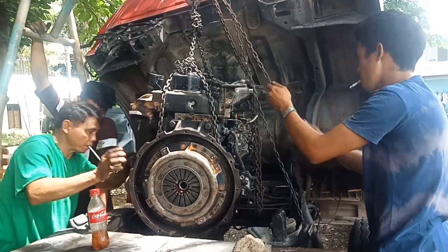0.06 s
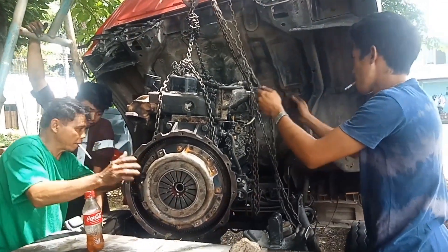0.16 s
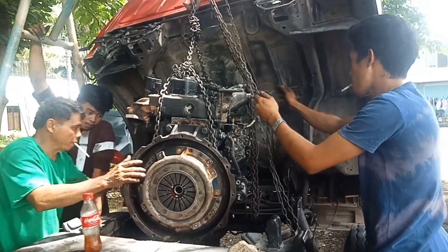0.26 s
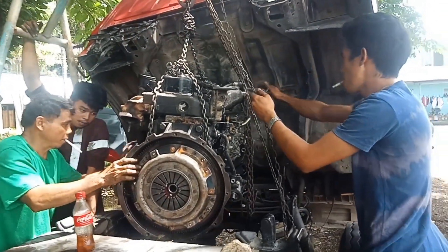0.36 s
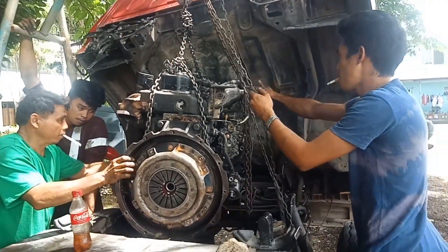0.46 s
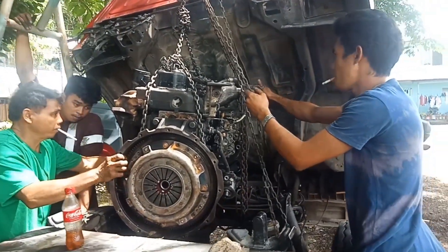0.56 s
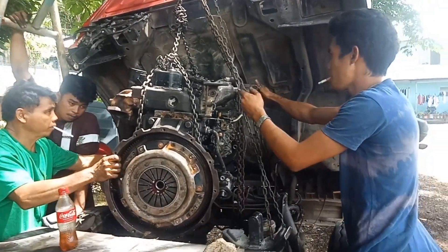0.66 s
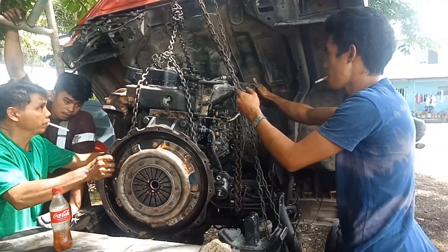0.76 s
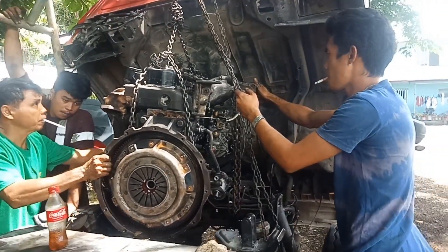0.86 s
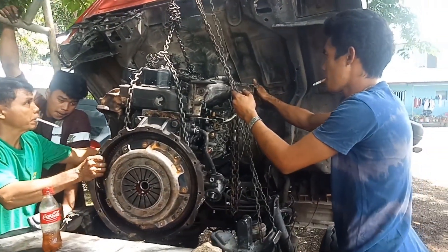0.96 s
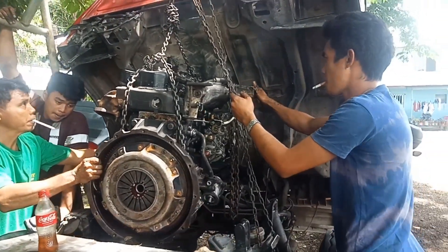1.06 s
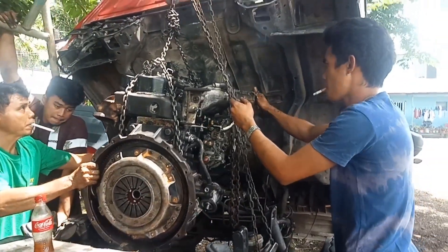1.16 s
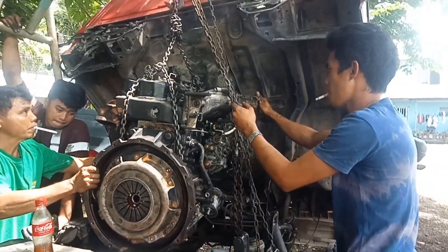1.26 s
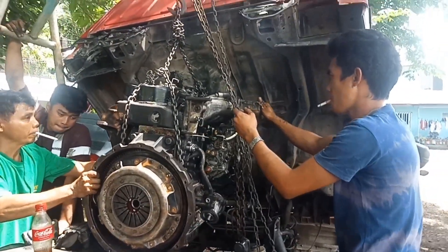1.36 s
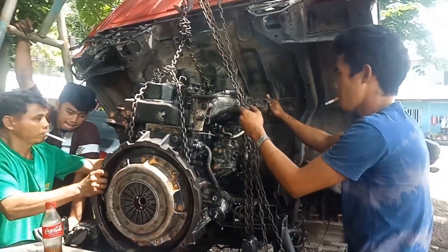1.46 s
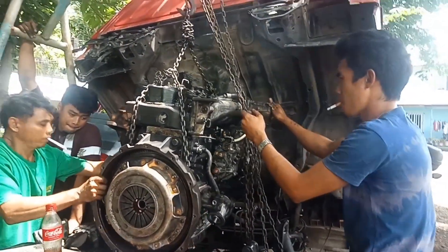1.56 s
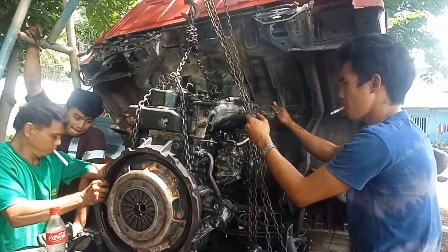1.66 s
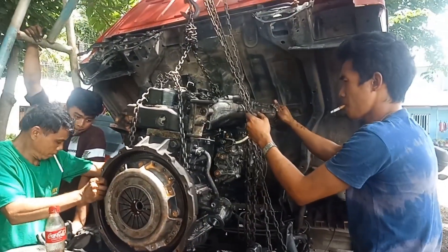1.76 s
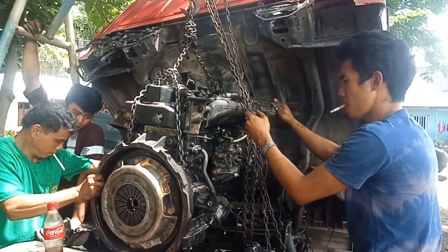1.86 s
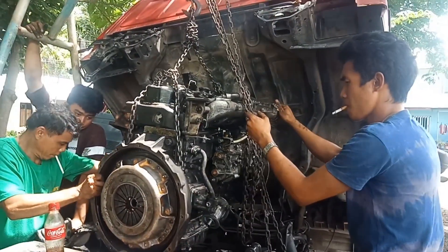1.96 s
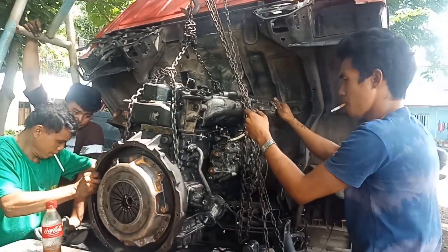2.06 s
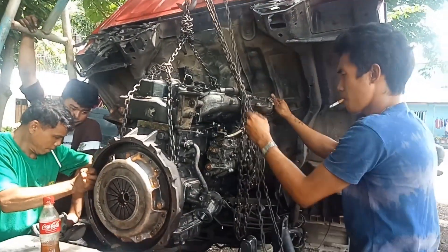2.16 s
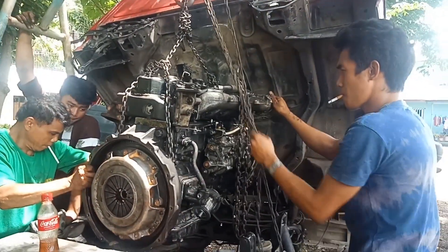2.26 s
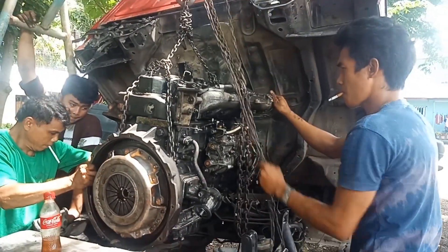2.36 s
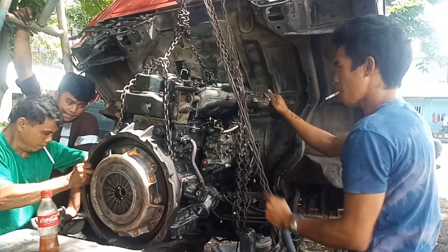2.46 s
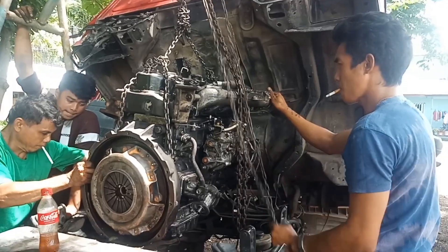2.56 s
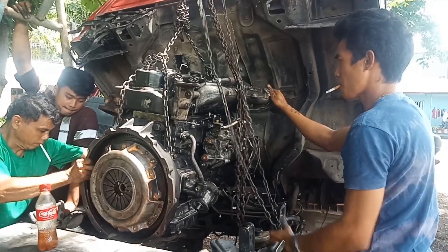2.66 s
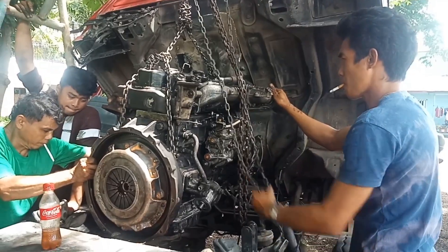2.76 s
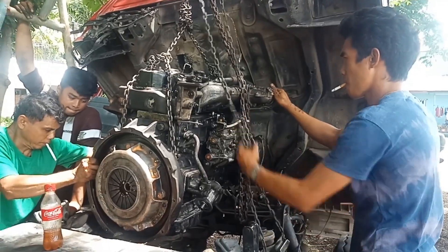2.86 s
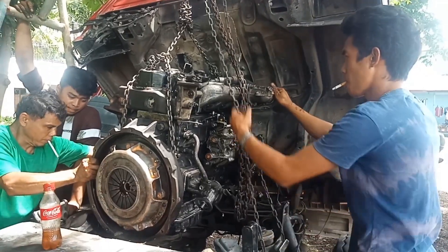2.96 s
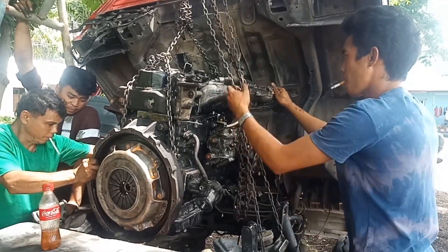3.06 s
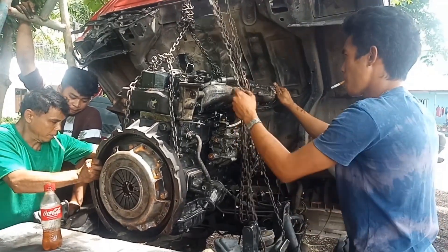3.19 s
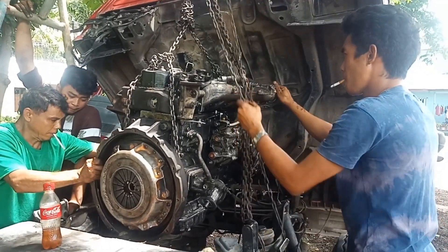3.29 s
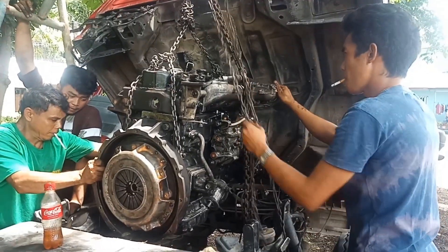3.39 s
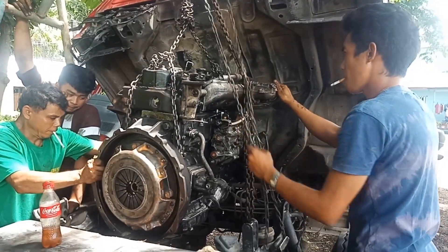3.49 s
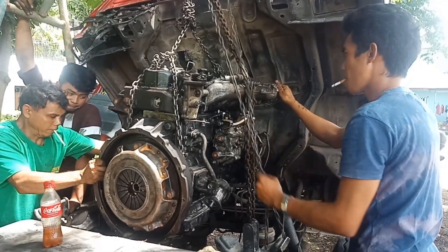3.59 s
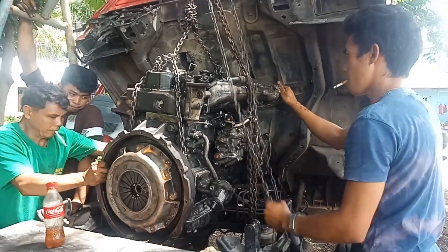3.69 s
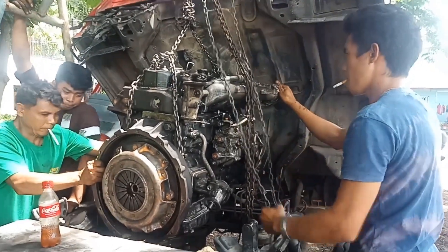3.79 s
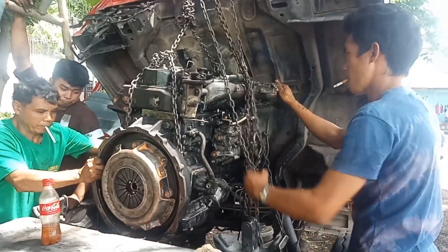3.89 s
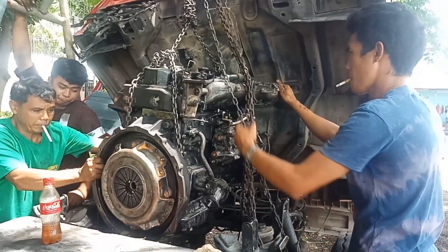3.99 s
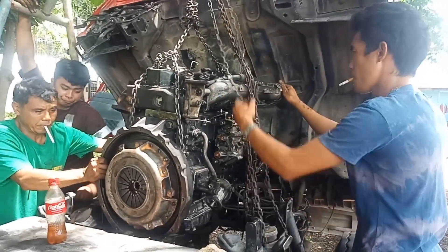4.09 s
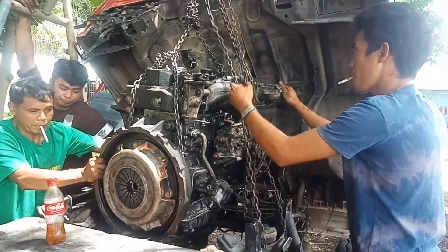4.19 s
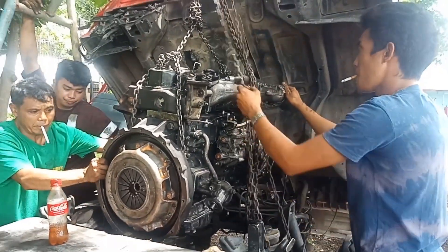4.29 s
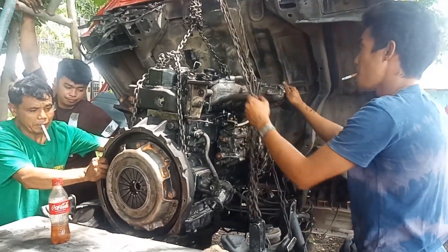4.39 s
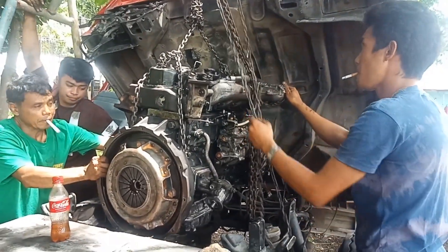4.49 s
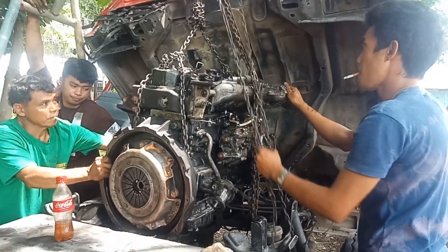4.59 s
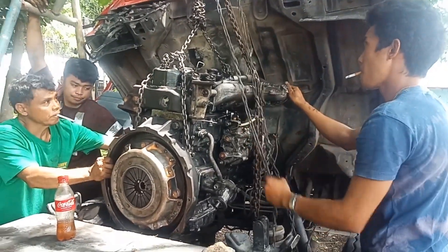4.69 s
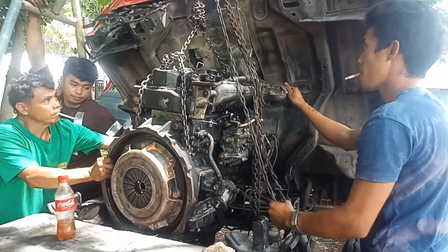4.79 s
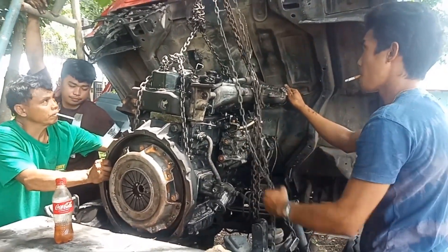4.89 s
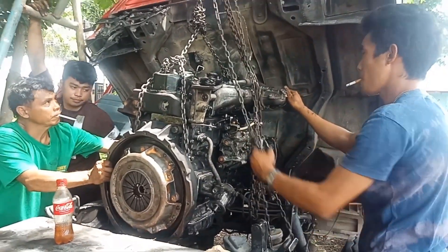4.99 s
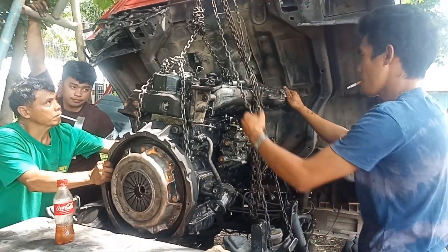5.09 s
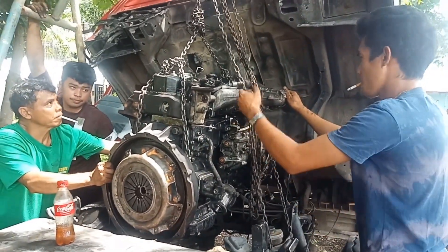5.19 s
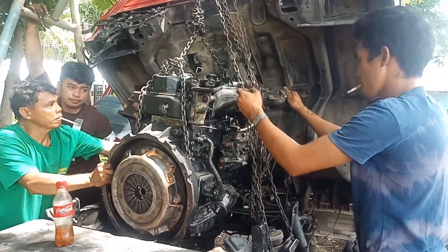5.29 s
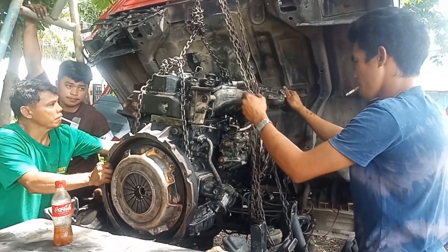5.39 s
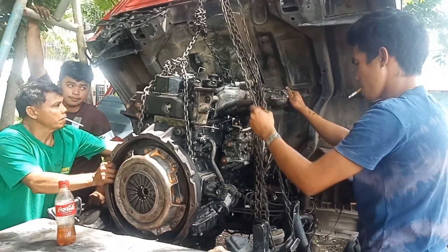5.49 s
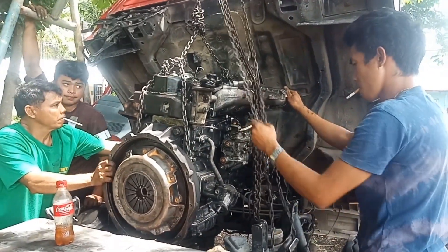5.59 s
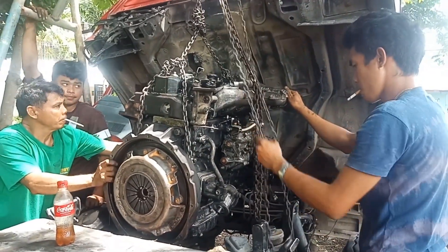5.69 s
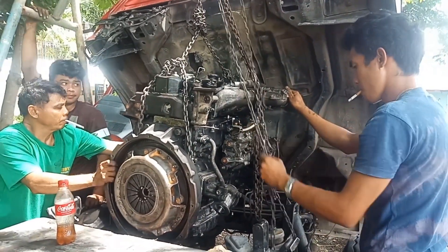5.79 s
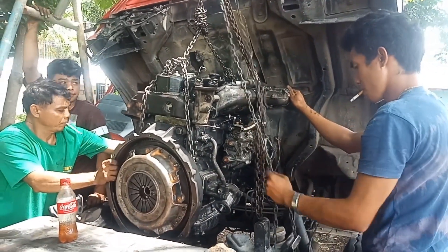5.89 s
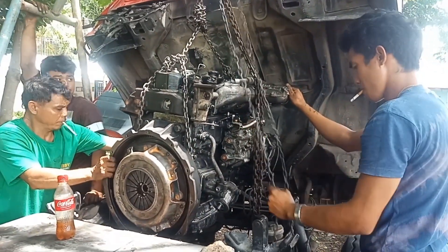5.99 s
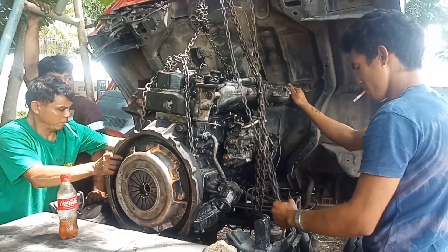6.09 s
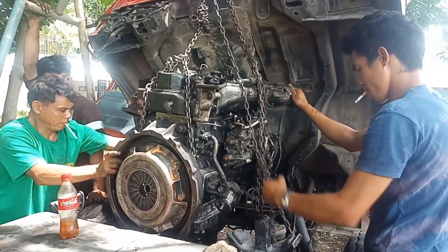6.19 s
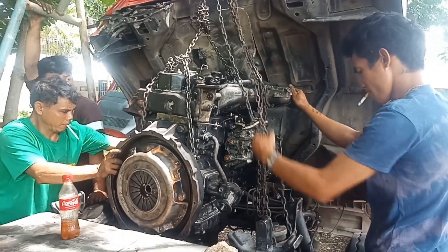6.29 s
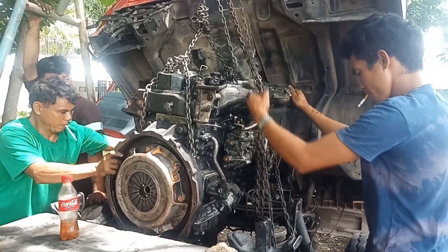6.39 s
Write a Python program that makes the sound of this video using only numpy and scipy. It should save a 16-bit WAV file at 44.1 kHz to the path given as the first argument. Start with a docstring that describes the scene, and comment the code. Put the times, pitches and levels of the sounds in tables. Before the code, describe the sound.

A slack steel chain clinks briefly, a faint bird whistles, then four rattling pulls run links clacking through a hand hoist in an open yard.

```python
"""A chain hoist lifts an engine under a tilted truck cab in an open-air workshop.
Filtered noise makes the yard, and wavering sine tones make a motor droning far away that speeds up at the end.
First the slack hand chain clinks a few times: noise and decaying tones ring like struck steel.
Then a small far-off bird gives thin gliding whistles. Four pulls follow: links clack on the guide,
knock into the pockets of the hand wheel as short hollow tones, and jingle against each other."""
import sys
import numpy as np
from scipy import signal
from scipy.fft import rfft, irfft
from scipy.io import wavfile
from scipy.ndimage import uniform_filter1d, minimum_filter1d

SR = 44100
rng = np.random.default_rng(int(sys.argv[2]) if len(sys.argv) > 2 else 0)


def dump(signal):
    """Clip the signal to [-1, 1] and save it as 16-bit WAV at the path in sys.argv[1]."""
    limited = np.clip(np.atleast_2d(signal).T, -1, 1)
    pcm = np.round(limited * 32767).astype(np.int16)
    wavfile.write(sys.argv[1], SR, pcm)


N = 284344
TIME = np.arange(N) / SR


def amp(db):
    """Turns decibels into a gain."""
    return 10 ** (np.asarray(db) / 20)


def unit(x):
    """Scales a sound to an average (rms) strength of 1."""
    return x / np.sqrt(np.mean(x ** 2) + 1e-20)


def read(points, hz):
    """Reads a curve between its points, with pitch on a log scale."""
    point_hz, value = np.transpose(points)
    return np.interp(np.log(hz + 1), np.log(point_hz + 1), value)


def add(mix, s, sound):
    """Mixes a sound in at time s, in seconds."""
    part = mix[max(round(s * SR), 0):][:len(sound)]
    part += sound[:len(part)]


def band(x, low_hz, high_hz):
    """Keeps the part of a sound between two pitches."""
    return signal.sosfilt(signal.butter(2, [low_hz, high_hz], "band", fs=SR, output="sos"), x)


def colour(x, gain_db):
    """Filters with gains on an even grid from 0 to SR / 2; nothing sounds early, so attacks stay sharp."""
    log_gain = np.log(amp(np.maximum(gain_db - gain_db.max(), -100)))
    circle = np.concatenate([log_gain, log_gain[-2:0:-1]])
    taps = irfft(np.exp(np.conj(signal.hilbert(circle)))[:len(log_gain)])
    return signal.fftconvolve(x, taps)[:len(x)]


# colour of the outdoor noise: (pitch_hz, relative level_db)
AIR = [(15, -65.5), (25, -43.5), (48, -21.5), (64, -7.5), (101, -4.5), (160, -2), (253, -18), (313, -16),
       (433, -24.5), (469, -24), (741, -24.5), (4000, -30.5), (4800, -45.5), (5880, -55), (15500, -58.5)]
# distant motor: (time_s, relative level_db of the low tone, relative level_db of its octave)
MOTOR = [(0.0, -59, -59), (0.9, -49, -54), (0.95, -61.5, -68), (3.43, -53, -49.5), (4.92, -56.5, -60.5),
         (5.44, -53.5, -45.5), (6.45, -44.5, -57)]
# speed of the motor, rising at the end: (time_s, firing rate_hz)
MOTOR_RATE = [(0, 75.8), (5.7, 79), (6.2, 83.7)]


def yard(air_db=-52.5, swell_db=1, hiss_db=-84, rumble_db=-70, motor_db=-1):
    """Gently swelling outdoor noise, and a far motor as two tones that waver in pitch and strength."""
    drift = []
    for _ in range(4):
        slow = uniform_filter1d(rng.standard_normal(N), size=5000)
        drift.append(unit(uniform_filter1d(slow, size=3000)))
    air_gain = amp(read(AIR, np.fft.rfftfreq(N, 1 / SR)))
    air = irfft(rfft(rng.standard_normal(N)) * air_gain, N)
    air = amp(air_db + swell_db * drift[3]) * unit(air)
    hiss = amp(hiss_db) * rng.standard_normal(N)
    rumble = amp(rumble_db) * unit(band(rng.standard_normal(N), 35, 65))

    s, *columns = np.transpose(MOTOR)
    low_db, high_db = (motor_db + np.interp(TIME, s, column) for column in columns)
    hz = np.interp(TIME, *np.transpose(MOTOR_RATE))
    phase = 2 * np.pi * np.cumsum(hz * (1 + 0.012 * drift[0])) / SR
    low = amp(low_db + 2 * drift[1]) * np.sin(phase)
    octave = amp(high_db + 2 * drift[2]) * np.sin(2 * phase)
    return air + hiss + rumble + np.sqrt(2) * (low + octave)


# a small bird far off: (start_s, length_s, start_pitch_hz, end_pitch_hz, level_db)
CHIRPS = [(1.2, 0.23, 4950, 4500, -70.5), (1.44, .16, 5100, 4850, -81), (1.655, .025, 5700, 5400, -73),
          (2.09, .04, 5800, 5600, -75)]


def bird(flutter=0.014):
    """Thin falling whistles with a fluttering pitch."""
    out = np.zeros(N)
    for s, length, start_hz, end_hz, db in CHIRPS:
        hz = np.geomspace(start_hz, end_hz, round(length * SR))
        wobble = unit(uniform_filter1d(rng.standard_normal(len(hz)), size=150))
        hz = hz * (1 + flutter * wobble)
        add(out, s, amp(db) * np.hanning(len(hz)) * np.sin(2 * np.pi * np.cumsum(hz) / SR))
    return out


# how long the echoes last: (pitch_hz, time to fall by 60 dB_s)
SHED = [(250, 0.99), (700, 0.25), (1800, 0.27), (4500, 0.14), (12000, 0.12)]


def shed(x, wet_db=-10, first_s=.012):
    """Scattered echoes from cab and roof, the low pitches lasting longest."""
    taps = rng.standard_normal(SR // 2) * (rng.random(SR // 2) < 3000 / SR)  # about 3000 echoes a second
    hz, t, z = signal.stft(taps, SR, nperseg=256)
    fade = amp(-60 * t / read(SHED, hz)[:, None])
    tail = signal.istft(z * fade, SR, nperseg=256)[1]
    out = x.copy()
    add(out, first_s, amp(wet_db) * signal.fftconvolve(x, tail / np.linalg.norm(tail)))
    return out


# the swinging loop bumping the engine and frame: (start_s, relative level_db, pitch_hz)
BUMPS = [(0.215, -29, 340), (0.566, -40.5, 340), (2.209, -24, 306), (2.916, -41, 285), (4.019, -35, 265),
         (4.988, -20, 352), (5.08, -25, 272), (5.149, -32, 250), (5.586, -24, 284), (5.659, -21, 333),
         (5.8, -23, 264), (6.028, -21, 255), (6.262, -20.5, 375)]


def bumps(level_db=-3, octaves=0.48, rise_s=.003, t60_s=0.22):
    """Dull blows: a short burst of noise gathered around one low pitch."""
    t, hz = np.arange(SR // 3) / SR, np.fft.rfftfreq(4096, 1 / SR)
    out = np.zeros(N)
    for s, db, pitch in BUMPS:
        blow = rng.standard_normal(len(t)) * amp(-60 * t / t60_s) * (1 - np.exp(-t / rise_s))
        distance = np.log2((hz + 1) / pitch) / octaves
        blow = colour(blow, -10 * np.log10(1 + distance ** 4))
        add(out, s, amp(db + level_db) * blow / abs(blow).max())
    return out


# long-ringing tones of the frame: (pitch_hz, relative level_db, time to fall by 60 dB_s)
FRAME = [(270.6, -12, 0.19), (309, -12.5, 0.11), (1002, -4, 0.09), (1054, -3, 0.18), (1980, -6, .12),
         (2915, -6.5, 0.18)]


def frame(chain, contact, level_db=-39, firmness=1.2):
    """The loop clatters dully wherever it touches the frame; firm contact favours the long-ringing tones."""
    t = np.arange(SR // 2) / SR
    drive = chain * contact ** firmness
    rings = np.zeros(N)
    for hz, db, t60 in FRAME:
        tone = amp(-60 * t / t60) * np.sin(2 * np.pi * hz * t)
        rings += amp(db) * unit(signal.fftconvolve(drive, tone)[:N])
    clatter = band(chain * contact, 220, 480)
    return amp(level_db) * rings + clatter


PULL_SKEW, SWAY_SKEW = 0.58, 0.63  # below 1, a movement is fastest early on


def stroke(start, length, skew):
    """Speed of the chain, 0 to 1, through one movement: it gathers quickly and runs out slowly."""
    progress = np.clip((TIME - start) / length, 0, 1)
    return np.maximum(np.sin(np.pi * progress ** skew), 0)


# hauls on the hand chain:
# (start_s, length_s, relative level_db at full speed, closeness of the loop to the frame_db)
PULLS = [(2.19, 0.74, -17, -15), (3.335, 0.64, -14.5, -17), (4.42, 0.54, -14.5, -17),
         (5.56, 0.98, -16, -2.5)]
# the slack loop swaying or being gathered up between pulls: the same four columns
SWAYS = [(0.216, 0.24, -44.5, -13), (0.461, 0.35, -38, -11.5), (2.139, 0.34, -41, -20),
         (2.803, 0.42, -36.5, -2), (3.209, 0.48, -28, -13.5), (4, 0.35, -36, -7.5), (4.327, 0.26, -28, -14),
         (4.964, 0.33, -29, -3), (5.394, 0.49, -28, -19)]


def motion(speed_power=0.84):
    """Loudness of the pulled chain and of the slack loop, and the share of their rattle reaching the frame."""
    moves = [(row, PULL_SKEW) for row in PULLS] + [(row, SWAY_SKEW) for row in SWAYS]
    levels = []
    for (s, length, db, _), skew in moves:
        levels.append(amp(db) * stroke(s, length, skew) ** speed_power)  # faster is louder
    levels = np.array(levels) + 1e-9
    closeness = amp([touch_db for (*_, touch_db), _ in moves])
    contact = closeness @ levels / levels.sum(0)
    pulled, slack = levels[:len(PULLS)].sum(0), levels[len(PULLS):].sum(0)
    return pulled, slack, contact


def passing_links(level, links_per_s=34, scatter_db=3, jitter_s=.006):
    """Time and strength in dB of each link a pull draws through the hoist, links_per_s at full speed."""
    speed = sum(stroke(s, length, PULL_SKEW) for s, length, _, _ in PULLS)
    links_passed = np.cumsum(speed) * links_per_s / SR + rng.random()
    at = np.flatnonzero(np.diff(np.floor(links_passed)))
    late, strength = rng.uniform(-1, 1, size=(N // 100, 2))[:len(at)].T
    db = 20 * np.log10(level[at]) + scatter_db * strength
    return list(zip(at / SR + jitter_s * late, db))


# single links ringing freely: (start_s, level_db, pitch_hz)
PINGS = [(0.218, -13, 2233), (0.22, -17.5, 1032), (0.864, -29, 3470), (2.459, -16, 3210), (4.01, -15, 2250),
         (5.08, -24, 2270), (5.799, -10, 1036), (6.262, -18.5, 426.5), (6.309, -16, 2420),
         (6.323, -19, 1014)]


def pings(t60=0.099, rise_s=.002):
    """A link that swings clear keeps one note for a moment."""
    t, out = np.arange(SR // 3) / SR, np.zeros(N)
    for s, db, hz in PINGS:
        loudness = amp(db - 60 * t / t60) * (1 - np.exp(-t / rise_s))
        add(out, s, loudness * np.sin(2 * np.pi * hz * t))
    return out


def wheel(running, level_db=3, centre_hz=735, width_hz=170, octave_db=-6):
    """The running chain keeps the hollow hand wheel and its octave sounding between the knocks."""
    low = band(running, centre_hz - width_hz / 2, centre_hz + width_hz / 2)
    high = band(running, 2 * centre_hz - width_hz / 2, 2 * centre_hz + width_hz / 2)
    return amp(level_db) * (low + amp(octave_db) * high)


# distinct links, mostly loud, dropping into the pockets of the hand wheel: (time_s, relative level_db, pitch_hz)
KNOCKS = [(2.144, -43.5, 796), (2.212, -14.5, 762), (2.331, -14.5, 765), (2.401, -17, 668),
          (2.622, -15.5, 693), (2.762, -23, 717), (3.276, -24, 864), (3.374, -7.5, 706), (3.444, -13, 668),
          (3.637, -11.5, 716), (3.703, -18.5, 748), (3.805, -3.5, 775), (3.912, -20, 755),
          (4.392, -13, 711), (4.529, -12.5, 683), (4.585, -12.5, 687), (4.686, -9.5, 706),
          (4.867, -10.5, 694), (5.452, -12.5, 688), (5.623, -12.5, 797), (5.784, -6, 691),
          (6.025, -13, 712), (6.155, -10, 694), (6.262, -11, 683)]
# range of pitch of all the other links as they seat: (lowest_hz, highest_hz)
SOFT_KNOCK_HZ = (665, 798)
# tones of the wheel: (multiple of the knock pitch, relative level_db, time to fall by 60 dB_s)
WHEEL = [(1, 1.5, 0.028), (1.13, -8.5, 0.035), (2.0, -7, 0.036)]


def knocks(level, level_db=4.0, soft_db=-10, rise_s=0.0036, lead_s=0.00051):
    """A seating link gives the hand wheel a short hollow knock; most seat softly."""
    t, out = np.arange(SR // 8) / SR, np.zeros(N)
    soft = [(s, db + soft_db, rng.uniform(*SOFT_KNOCK_HZ)) for s, db in passing_links(level)]
    for s, db, hz in list(KNOCKS) + soft:
        ring = np.zeros(len(t))
        for multiple, tone_db, t60 in WHEEL:
            ring += amp(tone_db - 60 * t / t60) * np.sin(2 * np.pi * (multiple * hz * t + rng.random()))
        ring = ring * (1 - np.exp(-(t / rise_s) ** 2))
        add(out, s - lead_s, amp(db + level_db) * ring / abs(ring).max())
    return out


# colour of struck chain: (pitch_hz, relative level_db)
STEEL = [(100, -30), (200, -25.5), (280, -15.5), (500, -18), (720, -4.5), (1150, -6), (1900, -3),
         (3500, -2.5), (4450, -7), (5200, -17), (6500, -23), (8000, -32), (13000, -32), (15500, -40.5)]
# tones of the hoist housing and chain guide: (pitch_hz, relative damping_hz, relative level_db)
HOUSING = [(1055, 23, 1.5), (1270, 31, -17), (1253, 14, -6.5), (1405, 73, 3.5), (1600, 33, -18),
           (1872, 80, 13.5), (2050, 23, -1), (2073, 98, -8.5), (2350, 30, -1), (2626, 190, 7.5),
           (3053, 59, 3.5), (3116, 100, 5), (3173, 55, 3.5), (3450, 50, 7.5), (3555, 17, -8.5),
           (3807, 55, 6.5), (4104, 83, 1.5), (4222, 87, 5.5), (4400, 38, -18)]


def link(treble_db, note_hz, chatter_s, note_db, ring_t60=0.093, modes_db=-1, note_t60=0.038,
         touch_s=.00008, first_touch=0.87, count=5):
    """One link hit: a quick chatter of contacts rings the dense steel tones, the housing and the link's note."""
    t, hz = np.arange(7000) / SR, np.fft.rfftfreq(2048, 1 / SR)
    crack = rng.standard_normal(len(t)) * amp(-60 * t / ring_t60)
    tone_db = read(STEEL, hz) + treble_db * np.clip((hz - 4500) / 1500, 0, 1)
    f, damping, db = np.transpose(HOUSING)[:, :, None]
    weight, phase = rng.standard_normal((2, len(HOUSING), 1))  # each contact point favours other tones
    modes = weight * amp(db) * np.sin(2 * np.pi * (f * t + phase)) * np.exp(-np.pi * damping * .8 * t)
    modes = modes.sum(0) * (1 - np.exp(-t / touch_s))
    body = unit(colour(crack, tone_db)) + amp(modes_db) * unit(modes)

    hit = first_touch * body
    for k, (jitter, size) in enumerate(rng.uniform(.3, 1, size=(count, 2))):  # bounces before it settles
        add(hit, (k + jitter) / count * chatter_s, size * body * rng.choice([-1, 1]))
    note = np.sin(2 * np.pi * (note_hz * t + rng.random()))
    note = note * amp(-60 * t / note_t60) * (1 - np.exp(-t / (chatter_s / 2)))
    hit = unit(hit) + amp(note_db) * unit(note)
    return hit / np.sqrt(uniform_filter1d(hit ** 2, size=300).max())  # loudest short stretch has rms 1


def jingle(level_db=-4, per_s=180, spread_db=4.5, treble_db=-4, count=70):
    """Many small collisions along a moving chain, taking turns among link hits with rings of their own."""
    happens = rng.random(N) < per_s / SR
    sizes = amp(spread_db * np.minimum(rng.exponential(1, N), 3)) * happens
    links = [link(treble_db, rng.uniform(1400, 4600), chatter_s=.003, note_db=-6) for _ in range(count)]
    out = np.zeros(N)
    for at in np.flatnonzero(sizes):
        add(out, at / SR, sizes[at] * links[at % count])
    return amp(level_db) * unit(out)


# single distinct link hits, faint to loud, on the guide and each other:
# (time_s, relative level_db, relative treble_db, strongest note pitch_hz)
CLACKS = [(0.112, -30, -42.5, 1876), (0.217, -1, -33, 2830), (0.222, -5, -40, 3050),
          (0.278, -9.5, -34, 3850), (0.342, -23.5, -36, 3120), (0.483, -19.5, -48, 2200),
          (0.564, -12.5, -48, 2606), (0.573, -21, -51.5, 3405), (0.66, -27, -40.5, 1860),
          (0.678, -24, -41, 3880), (0.863, -20.5, -27.5, 3180), (0.869, -22.5, -55.5, 3230),
          (2.194, -21.5, -57, 3490), (2.213, -8.5, -47, 2060), (2.223, -4, -45, 1974),
          (2.243, -5.5, -40, 1970), (2.3, -1.5, -33, 3540), (2.337, -4.5, -29, 2580),
          (2.349, -1.5, -41, 4060), (2.382, -0.5, -33.5, 3310), (2.427, -1, -34, 1950),
          (2.477, -1, -33, 1455), (2.525, -6.5, -26, 2700), (2.567, -7.5, -33, 3500),
          (2.636, -17, -26, 3640), (2.71, -2.5, -36, 1890), (2.764, -7.5, -29, 3670),
          (2.877, -2, -27, 3535), (2.886, -2, -40.5, 3266), (2.902, -4.5, -47, 2240),
          (3.218, -26, -41.5, 3440), (3.274, -11.5, -39, 1440), (3.353, -4.5, -33.5, 3200),
          (3.371, -4, -53, 1266), (3.43, 2.5, -28.5, 3580), (3.493, -3.5, -22.5, 4110),
          (3.537, -4.5, -47, 1956), (3.569, -10, -34, 1950), (3.64, -6.5, -27, 3090),
          (3.666, 2.5, -34.5, 3230), (3.716, 2, -31.5, 1883), (3.755, 8, -32.5, 3490),
          (3.806, 2.5, -36.5, 1397), (3.868, -8.5, -41, 1390), (3.895, -10.5, -28.5, 2475),
          (3.912, -6.5, -34.5, 1850), (3.991, -8.5, -25, 2416), (4.004, -2, -35.5, 3534),
          (4.02, -2, -46.5, 2504), (4.085, -18, -35, 3480), (4.131, -16.5, -34, 3080),
          (4.178, -18.5, -42, 1970), (4.208, -18, -35, 2230), (4.227, -19.5, -41, 2180),
          (4.328, -17.5, -41, 1900), (4.394, -4, -37, 1468), (4.451, -4.5, -40, 3170),
          (4.483, -1, -36, 3100), (4.526, -2, -31, 1970), (4.565, 2.5, -31, 1914),
          (4.586, -4.5, -37.5, 1950), (4.624, -7.5, -24, 3560), (4.663, -2.5, -26, 1850),
          (4.763, -5, -21, 3650), (4.808, -1.5, -25, 3720), (4.856, -6, -35.5, 3420),
          (4.87, -9.5, -26, 1484), (4.986, -12.5, -33, 3130), (5.001, -9.5, -46.5, 3030),
          (5.081, -8.5, -38, 1990), (5.09, -14, -49.5, 2060), (5.156, -14, -46, 1180),
          (5.177, -18.5, -35, 2260), (5.3, -26.5, -40, 3580), (5.452, -9, -46, 1500),
          (5.505, -0.5, -34.5, 3600), (5.583, -1, -36, 2600), (5.594, 0, -42.5, 1200),
          (5.66, -3.5, -27, 3150), (5.695, -8, -36, 3120), (5.767, -3.5, -27.5, 3050),
          (5.78, 1.5, -42, 1445), (5.858, -1.5, -32, 1486), (5.929, -1, -32.5, 3167),
          (5.951, -3, -33.5, 3530), (6.022, -5.5, -46, 1423), (6.094, -5.5, -36, 1923),
          (6.157, -10, -34.5, 1360), (6.262, -3, -36, 3724), (6.349, -9, -32, 4070),
          (6.417, -4.5, -31.5, 1844)]


def clacks(level, level_db=-12, usual_treble_db=-34, lead_s=0.000991, passing_db=-5):
    """The distinct link hits, and a clack, dull or bright, for every link that passes the guide."""
    out = np.zeros(N)
    for s, db, treble_db, hz in CLACKS:
        treble = np.clip(treble_db - usual_treble_db, -20, 8)
        hit = link(treble, hz, chatter_s=.011, note_db=-6.0)
        add(out, s - lead_s, amp(db + level_db) * hit)
    for s, db in passing_links(level):
        hit = link(rng.uniform(-12, 6), rng.uniform(1400, 4200), chatter_s=.005, note_db=-9)
        add(out, s, amp(db + passing_db) * hit)
    return out


def scene(lowest_hz=150):
    """The chain and the hoist under the roof, over the sound of the yard."""
    pulled, slack, contact = motion()
    rattle = jingle()
    chain = clacks(pulled) + (pulled + slack) * rattle + knocks(pulled) + wheel(pulled * rattle)
    steel = chain + pings() + bumps() + frame(chain, contact)
    no_bass = signal.butter(3, lowest_hz, "high", fs=SR, output="sos")  # small parts radiate no bass
    steel = signal.sosfilt(no_bass, steel)
    return (shed(steel + bird()) + yard())[None]


def record(dry, ceiling=0.74, edge_hz=15750):
    """A fast limiter holds the peaks; then everything above edge_hz is cut."""
    gain = np.minimum(1, ceiling / (abs(dry) + 1e-9))
    gain = uniform_filter1d(minimum_filter1d(gain, size=200), size=200)
    low_pass = signal.firwin(511, edge_hz, window=("kaiser", 9), fs=SR)
    return signal.oaconvolve(dry * gain, low_pass[None], "same")


dry = scene()
out = record(dry)
dump(out)
```